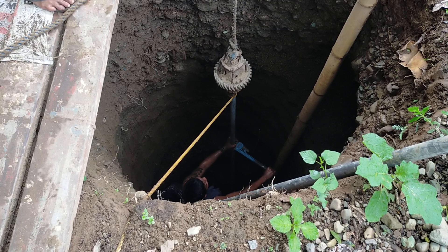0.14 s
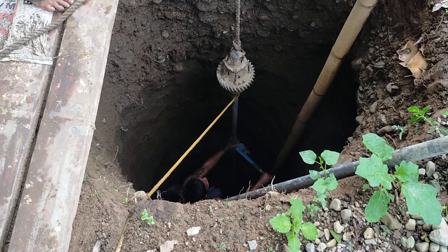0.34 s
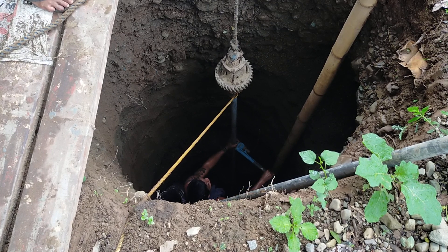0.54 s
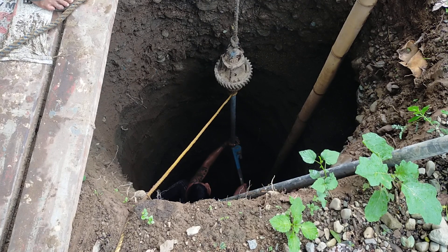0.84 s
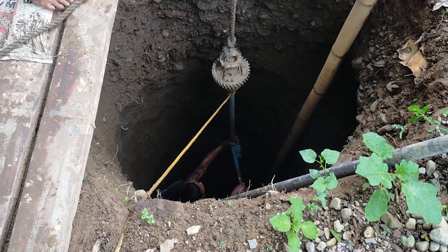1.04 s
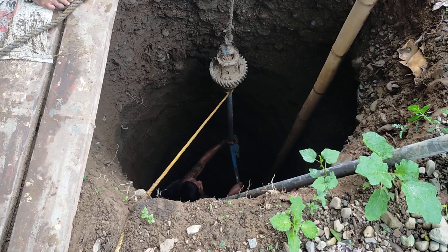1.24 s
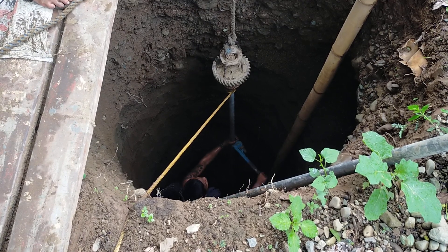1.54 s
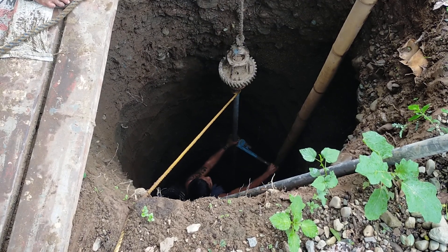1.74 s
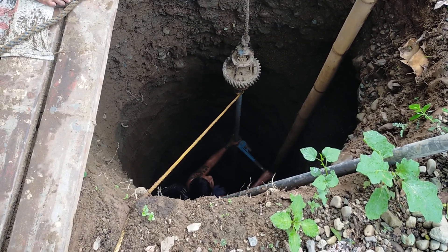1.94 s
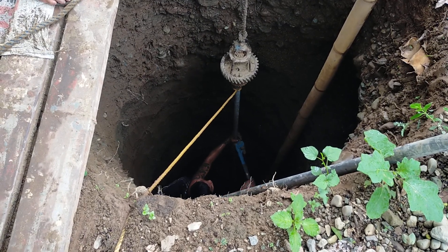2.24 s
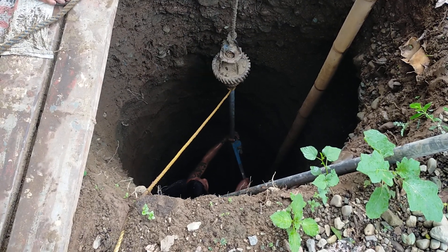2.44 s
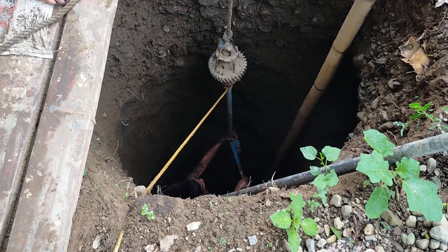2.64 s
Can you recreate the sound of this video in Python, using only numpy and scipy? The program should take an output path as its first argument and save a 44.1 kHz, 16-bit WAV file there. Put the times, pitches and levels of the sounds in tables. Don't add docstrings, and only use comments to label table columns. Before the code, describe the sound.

A wrench ratchets on a steel pipe in a dug earth pit, heard from the rim. Uneven chattering clacks cluster from 0.15 to 0.6 s, strongest near 0.55, then 0.8 to 1.1; sparse touches follow until 1.7, with a hard clank at 1.73 and dense clicking and faint scrapes to the end. Short rings, dull echoes, slight falling grit, faint low engine thumps and insect hiss.

```python
import sys
import numpy as np
from scipy import signal
from scipy.fft import rfft, irfft
from scipy.io import wavfile
from scipy.ndimage import uniform_filter1d

SR = 44100
rng = np.random.default_rng(int(sys.argv[2]) if len(sys.argv) > 2 else 0)


def generate_wav(signal):
    frames = np.transpose(np.atleast_2d(signal))
    scaled = np.clip(frames, -1, 1) * 32767
    pcm = np.round(scaled).astype(np.int16)
    wavfile.write(sys.argv[1], SR, pcm)


def invert_db(level):
    return 10 ** (np.asarray(level, dtype=float) / 20)


N = 121275


def unit(x):
    return x / np.sqrt(np.mean(x ** 2))


def on_log(table, hz):
    table_hz, table_db = np.array(table).T
    return np.interp(np.log(hz), np.log(table_hz), table_db)


def fade(t, t60):
    return np.exp(-np.log(1000) * t / t60)


def band(x, hz, width):
    edges = [hz - width / 2, hz + width / 2]
    return unit(signal.sosfilt(signal.butter(2, edges, "band", fs=SR, output="sos"), x))


def coloured(table, shape):
    hz = np.arange(shape[1] // 2 + 1) * SR / shape[1] + 1
    spectrum = rfft(rng.standard_normal(shape)) * invert_db(on_log(table, hz))
    return unit(irfft(spectrum, shape[1]))


def walk(rate):
    k = int(SR / rate)
    steps = np.repeat(rng.standard_normal(N // k + 1), k)
    return 1.06 * uniform_filter1d(steps, k)[:N]


def add(out, s, x):
    i = int(s * SR)
    out[i:i + len(x)] += x[:N - i]


def bank(hz, db, t60, t):
    hz, db, t60 = (np.asarray(v)[:, None] for v in (hz, db, t60))
    return invert_db(db) * np.sin(2 * np.pi * hz * t) * fade(t, t60)


# t/s, peak level/dB, treble level/dB, fade t60/s
BLOWS = [(.160, -25, -37, 0.11), (.176, -19, -26, 0.028), (.223, -14, -13.5, 0.45),
         (.287, -8.5, -13.5, 0.1), (.412, -11, -17, 0.11), (.499, -13.5, -22, 0.11), (.547, -5.5, -17, 0.2),
         (.790, -17, -18.5, 0.17), (.813, -23, -19, 0.75), (.914, -12.5, -16, .14), (1.005, -19, -16, 0.39),
         (1.038, -5.5, -18.5, 0.12), (1.356, -18.5, -16, 0.15), (1.681, -19, -32, 0.088),
         (1.729, -5, -17.5, 0.11), (1.793, -12.5, -14.5, 0.096), (1.821, -17.5, -20, 0.26),
         (1.911, -18, -19, 0.22), (1.974, -15.5, -18.5, 0.13), (2.149, -15, -21.5, 0.062),
         (2.233, -16, -22, 0.2), (2.246, -19, -21, 0.24), (2.259, -17.5, -19, 0.092),
         (2.336, -9, -14.5, 0.069), (2.424, -17, -17.5, 0.12)]
# lift of the lows, level/dB
HEFT_DB = [-10, 16, -3, -0.5, 0.5, 2, -0.5, 0, -1.5, -2.5, -3.5, -6, -4.5, -2, -5, -5.5, 5.5, -1, -3.5,
           -2.5, 0.5, -5, 2, -2, -5]
# t/s, peak level/dB, treble
# level/dB, fade t60/s
TOUCHES = [(0.001, -34, -23, 0.14), (0.075, -31.5, -23, 0.2), (0.324, -23, -42, 0.9),
           (0.438, -18, -25, 0.2), (0.609, -21.5, -19.5, 0.47), (0.729, -32, -20, 0.46),
           (0.801, -17.5, -18, 0.097), (1.089, -19, -40, 0.071), (1.131, -23.5, -20, 0.16),
           (1.267, -33.5, -33, 0.089), (1.417, -25.5, -21, 0.12), (1.553, -26.5, -28, 0.68),
           (1.928, -18.5, -35, 0.14), (1.997, -16.5, -22, 0.2), (2.049, -23, -20, 0.26),
           (2.102, -23.5, -17, 0.1), (2.457, -21.5, -18, 0.088), (2.481, -26.5, -20, 0.3),
           (2.57, -33.5, -16, 0.52), (2.691, -31, -27, 0.091), (2.74, -27, -20, 0.2)]
# f/Hz, level/dB
WRENCH = [(200, -20), (600, -23), (880, -10), (1600, -7.5), (1950, -2.5), (3200, -9.5), (4500, -17.5),
          (5900, -37), (7000, -64)]
# f/Hz, level/dB
SHEEN = [(5950, -4.5), (6300, -0.5), (7500, -5.5), (9400, -11), (12000, -10), (14000, -7), (15800, -11)]
# level/dB, ring t60/s
PIPE = [(-23, 0.6), (-6.5, 0.34), (-15, 0.37), (-7.5, 0.45), (8.5, 0.13), (13, 0.067), (-20, 0.4),
        (-1, 0.2), (-7, 0.74), (-2.5, 0.098), (-6, 0.15), (-5.5, 0.21), (-3, 0.16), (-20, 1)]
PIPE_HZ = [720, 903, 1251, 1575, 1876, 1971, 2234, 2356, 2643, 2944, 3522, 4030, 4500, 6240]
# level/dB, ring t60/s
HANDLE = [(-7.5, .3), (-0.5, 0.14), (-3.5, 0.13), (-10.5, .3), (-7.5, .3), (-8, .25), (-9.5, 0.2),
          (-16.5, 0.47), (-21, 0.44), (-13, 0.57), (-20.5, 0.25), (-25, 0.2), (-15.5, .13), (-16, 0.11)]
HANDLE_HZ = [2487, 3028, 3106, 3398, 3463, 3677, 3757, 5512, 6944, 7860, 10600, 11970, 12700, 14210]


def blows():
    out, t = np.zeros(N), np.arange(SR // 3) / SR
    chance = rng.standard_normal
    low_hz = np.sort(rng.uniform(648.3, 5890, size=160))
    high_hz = np.sort(rng.uniform(6050, 15800, size=200))
    body = bank(low_hz, on_log(WRENCH, low_hz), 0.076 * invert_db(chance(160)), t)
    sheen = bank(high_hz, on_log(SHEEN, high_hz), 0.16 * invert_db(chance(200)), t)
    pipe = bank(PIPE_HZ, *np.array(PIPE).T, t)
    handle = bank(HANDLE_HZ, *np.array(HANDLE).T, t)
    jaw = signal.butter(2, 1340, fs=SR)
    rattle, fizz = loose_parts(64, len(t))
    sheen_late = np.clip((t - 0.0024) / 0.004, 0, 1)
    snap = (1 + invert_db(6) * fade(t, 0.045)) / 2
    ending = 1 - t / t[-1]
    attack = np.minimum(t / 0.0029, 1)

    def norm(x):
        return x / np.std(x[:SR // 50])

    def scattered(modes):
        gains = np.sign(chance(len(modes))) * invert_db(4 * chance(len(modes)))
        return norm(gains @ modes)

    for k, (s, db, treble_db, t60) in enumerate(BLOWS + TOUCHES):
        contacts = np.zeros(SR // 30)
        when = np.abs(chance(8)) * 0.006 * SR
        when = np.minimum(when, len(contacts) - 1).astype(int)
        contacts[when] = np.sign(chance(8)) * invert_db(2 * chance(8) - 8.0)
        contacts[0] = 1

        def struck(modes, gains):
            return norm(signal.fftconvolve(gains @ modes, contacts)[:len(t)])

        x = norm(struck(body, np.sign(chance(160))) + invert_db(-3) * rattle[k] * fade(t, 1.0))
        bite = invert_db(0.38 * treble_db + 13.0)
        x = norm(x + bite * np.diff(x, 2, append=[0, 0]))
        tone = invert_db(-7) * scattered(pipe) + invert_db(-13) * scattered(handle)
        top = norm(struck(sheen, chance(200)) + invert_db(-1) * fizz[k] * fade(t, 1.0))
        if k < len(BLOWS):
            x = norm(x + (invert_db(HEFT_DB[k]) - 1) * signal.filtfilt(*jaw, x))
        x = x + invert_db(treble_db + 22.5 - 15) * sheen_late * top * snap
        damp = fade(t, max(t60, 0.02))
        x = x * damp + tone * damp ** 0.5
        add(out, s, x * ending * attack * invert_db(db - 9.5))
    return out


def loose_parts(rows, length):
    grain = invert_db(2 * np.repeat(rng.standard_normal((rows, length // 60)), 60, axis=1))
    rattle = coloured(WRENCH, (rows, length)) * grain
    fizz = coloured([(5600, -51)] + SHEEN + [(17000, -32)], (rows, length)) * grain
    return rattle, fizz


# t/s, level/dB, ring t60/s
RINGS = [(.224, -21, 0.067), (.224, -26, .12), (.29, -21, 0.1), (0.291, -17.5, 0.048), (.29, -25, 0.14),
         (0.289, -27, 0.081), (.413, -20.5, 0.14), (.415, -31, .2), (0.419, -28.5, 0.26), (.44, -38, .4),
         (.44, -32, 0.32), (.44, -22, 0.13), (.549, -20, .08), (.551, -17, 0.081), (.56, -25, 0.24),
         (.57, -34.5, 0.23), (.793, -28, .08), (.806, -23, 0.17), (.916, -26, 0.061), (.92, -35, 0.13),
         (0.919, -48, 0.32), (1.007, -27, 0.24), (1.008, -30.5, 0.15), (1.04, -19.5, 0.11),
         (1.04, -19.5, 0.18), (1.042, -39, 0.28), (1.042, -40, .1), (1.074, -27.5, 0.14), (1.075, -51, .2),
         (1.132, -33, 0.19), (1.36, -54, 0.27), (1.375, -54, 0.34), (1.683, -32.5, 0.13),
         (1.731, -25.5, 0.11), (1.733, -18, 0.1), (1.741, -40.5, 0.48), (2.24, -53, 3.5),
         (2.239, -47, 0.53), (2.252, -27.5, 0.084), (2.256, -28, 0.089), (2.28, -32, 0.22),
         (2.339, -25, .05), (2.338, -22, 0.052), (2.338, -28, 0.037), (2.346, -43, 0.24), (2.355, -56, .3),
         (.55, -24.5, .15), (2.426, -27, 0.23), (2.426, -30, 0.08), (2.46, -41, .3), (2.478, -31.5, 0.12)]
RING_HZ = [3677, 3165, 2643, 4030, 1936, 4500, 1936, 2944, 2643, 3522, 2251, 1869, 1971, 2643, 2250, 3522,
           2234, 2356, 2780, 4500, 6240, 2234, 3106, 1971, 2643, 6240, 12100, 1879, 10600, 2234, 6240,
           11970, 3522, 4500, 2944, 6240, 720, 6240, 2944, 1971, 2234, 1900, 3030, 4560, 6240, 10550, 903,
           2230, 1868, 3463, 1981]


def rings():
    out, t = np.zeros(N), np.arange(SR // 4) / SR
    ends = np.minimum(t / 0.004, 1) * np.minimum((t[-1] - t) / 0.015, 1)
    for (s, db, t60), hz in zip(RINGS, RING_HZ):
        wobble_db = 2 * np.interp(t * 50, np.arange(20), rng.standard_normal(20))
        add(out, s, invert_db(db + wobble_db) * bank([hz], [0], [t60], t)[0] * ends)
    return out


# t/s, level/dB, length/s
SCRAPES = [
    (0.841, -43.5, 0.032),
    (0.907, -48, .01),
    (0.952, -51, 0.031),
    (1.992, -48, 0.12),
    (2.064, -45, 0.047),
    (2.253, -46, 0.05),
    (2.307, -46, 0.028),
    (2.446, -55.5, 0.21),
]


def scrapes():
    out = np.zeros(N)
    rattle, fizz = loose_parts(64, SR // 3)
    rough = fizz + invert_db(-3.0) * np.diff(rattle, 2, append=[[0, 0]] * 64) * 9
    for (s, db, length), x in zip(SCRAPES, rough):
        n = int(length * SR)
        ticks = invert_db(3.5 * np.repeat(rng.exponential(size=80), SR // 350))
        add(out, s, invert_db(db) * unit(x[:n] * ticks[:n]) * np.hanning(n) ** 0.52)
    return out


def wrench():
    thin = signal.butter(1, 250, "high", fs=SR, output="sos")
    return signal.sosfilt(thin, blows() + rings() + scrapes())


def shaft(x):
    t = np.arange(SR // 3) / SR
    dull = signal.lfilter(*signal.butter(1, 5500, fs=SR), rng.standard_normal(len(t)))
    echo = dull * fade(t, 0.2) * np.minimum(t / 0.0085, 1)
    return x + invert_db(-7.5) * signal.fftconvolve(x, echo / np.linalg.norm(echo))[:N]


# t/s, thump level/dB
ENGINE = [(0.022, -51), (0.262, -72), (.458, -43), (0.616, -60), (0.903, -41.5), (1.053, -51),
          (1.216, -42.5), (1.419, -43), (1.528, -43), (1.868, -42.5), (2.035, -39.5), (2.157, -44),
          (2.365, -46), (2.447, -35.5), (2.51, -34.5), (2.563, -34.5), (2.716, -36.5), (2.767, -25)]
FIRINGS = [0, 3, 5, 7, 10, 12, 14, 17, 19, 26, 29, 31, 34, 35, 36, 37, 40, 41]


def engine():
    out, t = np.zeros(N), np.arange(SR // 6) / SR
    engine_s, engine_db = np.array(ENGINE).T
    when = np.interp(np.arange(FIRINGS[-1] + 1), FIRINGS, engine_s)
    swell = (1 - fade(t, 0.071)) * (1 - t / t[-1])
    for s, gap, c in zip(when, np.gradient(when), rng.standard_normal((80, 2))):
        hz = (104.6 + 3.1 * (1 / gap - 18)) * (1 + 0.011 * c[0])
        parts_hz = [hz, 2.0 * hz, 0.14 * hz, 1.06 * hz]
        x = bank(parts_hz, [0, -9, -8, -22], [0.06, 0.06, 0.06, 0.24], t).sum(0)
        db = np.interp(s, engine_s, engine_db) + 10.0 + 1.2 * c[1]
        if s < N / SR:
            add(out, s, x * swell * invert_db(db))
    return out


# t/s, level/dB, f/Hz, length/s
CLODS = [
    (1.292, -49.5, 330, 0.028),
    (1.959, -53, 230, .06),
    (1.995, -46, 234, .11),
    (1.998, -47, 403, 0.11),
]
# t/s, level/dB, length/s
GRIT = [
    (0.085, -48, .035),
    (0.099, -42, 0.0075),
    (1.158, -58, .006),
    (1.183, -58, .006),
    (1.44, -56, .01),
    (1.584, -51, .008),
    (2.08, -46, 0.038),
]


def earth():
    out = np.zeros(N)
    for s, db, hz, length in CLODS:
        n = int(length * SR)
        thud = band(rng.standard_normal(SR // 4), hz, 0.35 * hz)[-n:]
        add(out, s, invert_db(db) * thud * np.hanning(n) ** 0.5)
    for s, db, length in GRIT:
        n = int(length * SR)
        tick = band(rng.standard_normal(SR // 4), 15600, 4100)[-n:]
        add(out, s, invert_db(db) * tick * np.hanning(n))
    return out


# f/Hz, level/dB
AIR = [(25, 1), (110, -7.5), (250, -13.5), (450, -21), (850, -20), (2000, -17), (5000, -39), (15800, -31)]


def air():
    out = 0
    for hz in 30 * 2 ** np.arange(0, 9.01, 0.5):
        db = on_log(AIR, hz) + 10 * np.log10(hz) + 3.2 * walk(4.88)
        out = out + invert_db(db) * band(rng.standard_normal(N), hz, hz / 3)
    insects = band(rng.standard_normal(N), 7650, 950) * invert_db(-61.5 + 0.5 * walk(30.0))
    return invert_db(-52.5) * unit(out) + insects


def scene():
    return (shaft(wrench()) + engine() + earth() + air())[None]


def low_pass(x):
    return signal.sosfilt(signal.butter(12, 16820, fs=SR, output="sos"), x)


def record(dry):
    b, a = signal.iirnotch(5680, 9, SR)
    x = dry - 0.8 * (dry - signal.lfilter(b, a, dry))
    rounded = np.tanh(1.422 * x) / 1.378
    x = signal.sosfilt(signal.ellip(8, 0.2, 35, 15700, fs=SR, output="sos"), rounded)
    return low_pass(x)


dry = scene()
out = record(dry)
generate_wav(out)
```